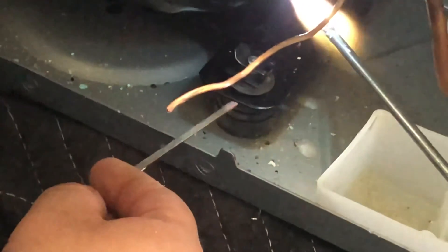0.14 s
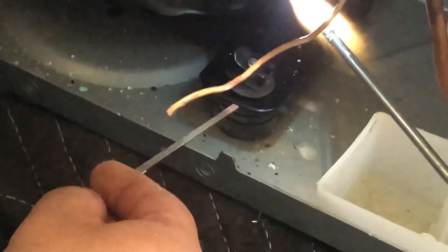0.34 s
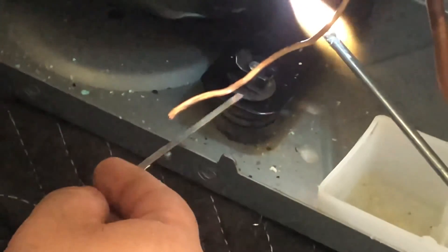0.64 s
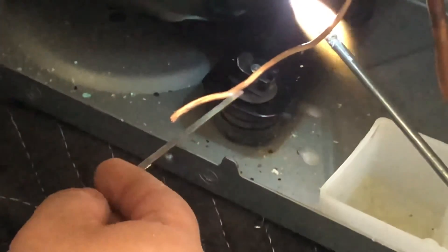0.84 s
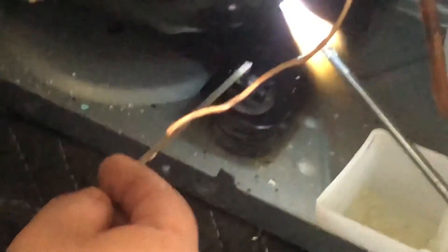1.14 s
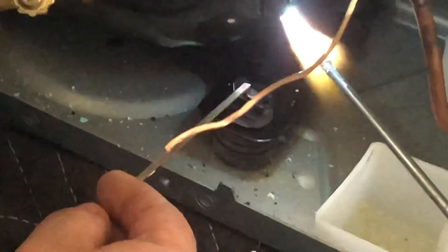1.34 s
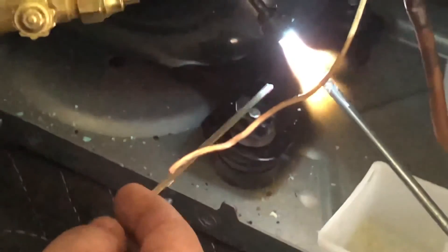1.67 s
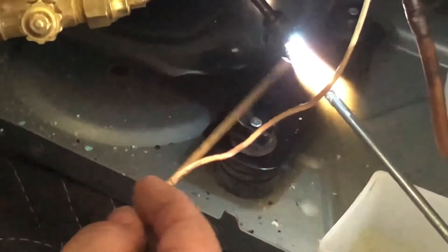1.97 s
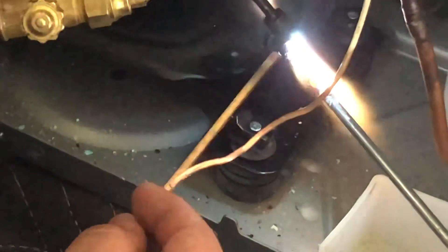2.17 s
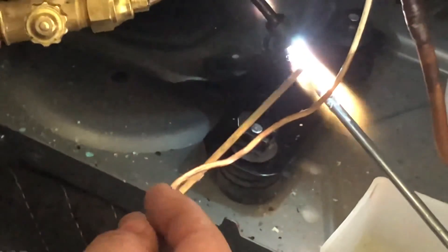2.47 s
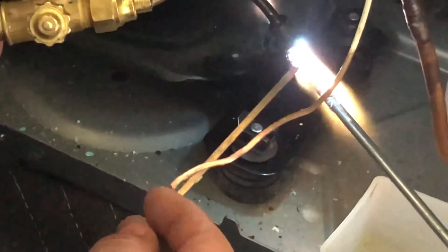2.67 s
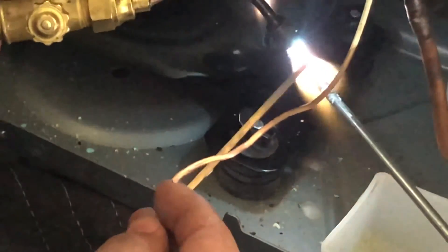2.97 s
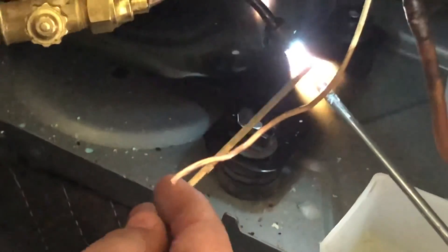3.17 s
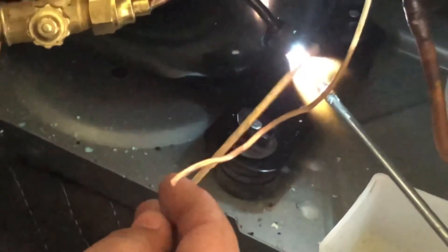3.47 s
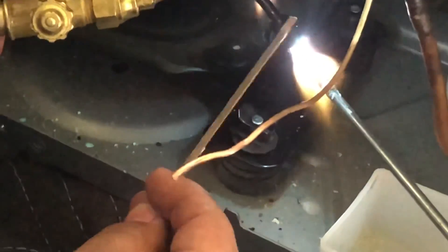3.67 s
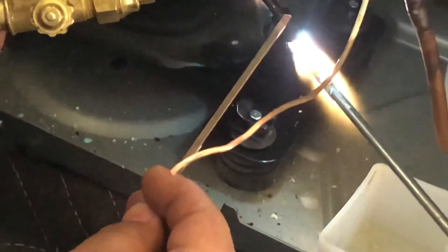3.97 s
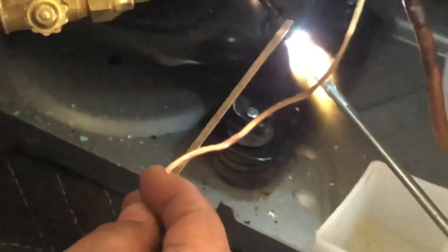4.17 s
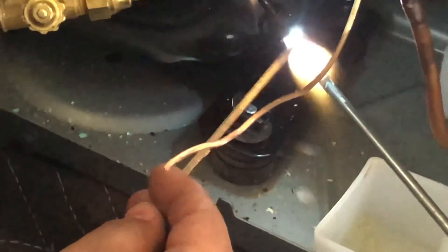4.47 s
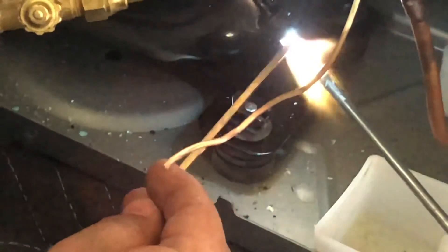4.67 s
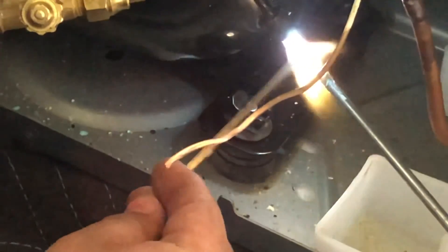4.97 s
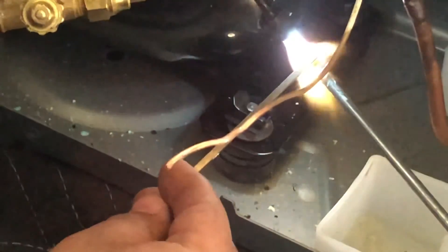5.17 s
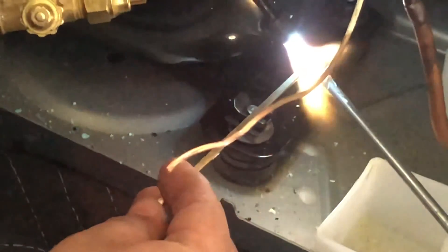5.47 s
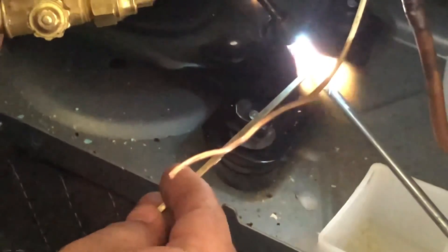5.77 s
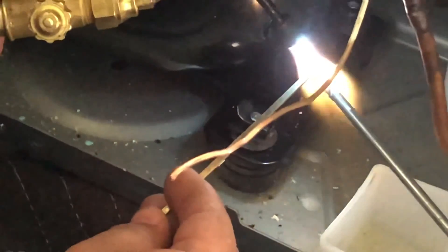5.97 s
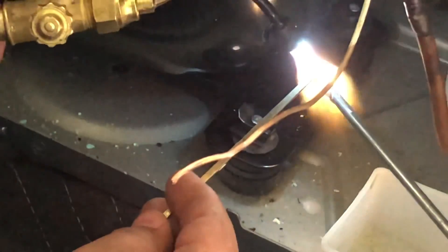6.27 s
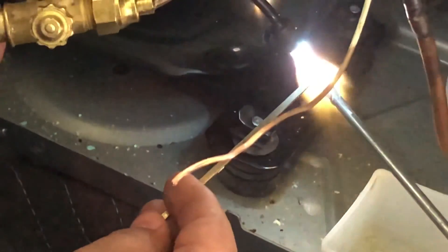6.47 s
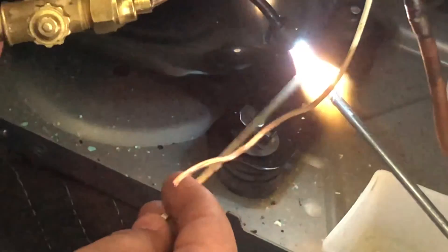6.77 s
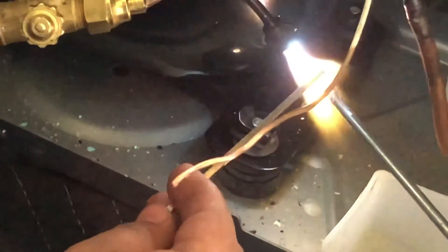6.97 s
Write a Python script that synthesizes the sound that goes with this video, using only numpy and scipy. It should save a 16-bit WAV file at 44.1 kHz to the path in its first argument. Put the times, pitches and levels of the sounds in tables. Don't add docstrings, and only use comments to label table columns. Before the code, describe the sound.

A gas torch is already burning close to the microphone and never stops. A strong, bright jet hiss dominates, over a thin roar with little deep bass that rings in an open metal cabinet. The hiss turns brighter near three seconds as the flame faces the work, with tiny flares, dips and constant fine flutter. The sound is essentially mono and ends still burning.

```python
import sys
import numpy as np
from scipy import signal
from scipy.fft import rfft, irfft
from scipy.io import wavfile
from scipy.ndimage import uniform_filter1d

SR = 44100
rng = np.random.default_rng(int(sys.argv[2]) if len(sys.argv) > 2 else 0)


def amplitude_ratio(level_db):
    exponent = np.asarray(level_db, float) / 20
    return 10 ** exponent


def generate_wav(sig):
    pcm = np.round(np.clip(np.atleast_2d(sig).T, -1, 1) * 32767).astype(np.int16)
    wavfile.write(sys.argv[1], SR, pcm)


N = 313551


def evened(x):
    return x / np.sqrt(np.mean(x ** 2) + 1e-20)


def resonances(table, hz):
    return sum(amplitude_ratio(db) ** 2 / (1 + (2 * (hz - f) / width) ** 2) ** 2 for f, width, db in table)


def above(hz, edge_hz, soft):
    return .5 + .5 * np.tanh(np.log((hz + 1) / edge_hz) / soft)


def thirds(hz, low_hz, high_hz, soft):
    above_low, above_high = above(hz, low_hz, soft), above(hz, high_hz, soft)
    return 1 - above_low, np.maximum(above_low - above_high, 0), above_high


def drift(shape, frames, bins):
    field = rng.standard_normal(shape)
    for size, axis in ((frames, 0), (bins, 1)):
        size = max(round(size), 1)
        field = uniform_filter1d(field, size, axis)
        field = uniform_filter1d(field, size, axis)
    return evened(field)


# time in seconds, lower edge in Hz, upper edge in Hz, level in dB.
SIDE_FLECKS = [(0.059, 4140, 6340, -33), (0.059, 11700, 13180, -38), (0.827, 8180, 10400, -34),
               (0.893, 12400, 13870, -31.6), (1.546, 5670, 6970, -38), (1.546, 7500, 9020, -35),
               (1.546, 12330, 14550, -30.8), (2.034, 6840, 9020, -36), (2.568, 13690, 15270, -35.0),
               (3.009, 11000, 12500, -37), (3.009, 13690, 15910, -32.6), (3.242, 8870, 10430, -33.4),
               (3.403, 5150, 6300, -35), (3.682, 12990, 14570, -27.8), (4.658, 14380, 15910, -31.7),
               (5.17, 10300, 11810, -33.6), (6.168, 8870, 10430, -33.6), (6.631, 8900, 10430, -33.5),
               (6.816, 4140, 5200, -37)]


def side_flecks():
    length, grid_start = 1024, 584
    out = np.zeros(N + 2 * length)
    n, line = np.arange(2 * length) + .5, np.arange(length) + .5
    line_hz = line * SR / (2 * length)
    fade = np.sin(np.pi / (2 * length) * n)
    waves = np.cos(np.pi / length * np.outer(n + length / 2, line)) * fade[:, None]
    for s, low_hz, high_hz, db in SIDE_FLECKS:
        at = grid_start + length * (round((s * SR - grid_start) / length) - 1)
        band = rng.standard_normal(length) * (line_hz > low_hz) * (line_hz < high_hz)
        out[at:at + 2 * length] += amplitude_ratio(db) * np.sqrt(2) * evened(waves @ band) / 2
    return out[:N]


def workshop(x, ripple_db=2.0):
    hz, _, z = signal.stft(x, SR, nperseg=4096)
    ripple = amplitude_ratio(ripple_db * drift(z.T.shape, 8, 3) * above(hz, 2660, 0.31))
    ripple /= np.sqrt(uniform_filter1d(ripple ** 2, size=60, axis=1))
    return signal.istft(z * ripple.T, SR, nperseg=4096)[1][:N]


# time in seconds, pose (0 raised, 1 aside, 2 facing, 3 on the rod, 4 on the joint).
TORCH_POSE = [(0, .01), (.6, 0.18), (1.0, 1.2), (1.3, 1.26), (2.98, 0.3), (3.05, 2), (3.2, 2.3), (3.3, 2),
              (4.5, 2), (4.8, 2.1), (5.15, 2.85), (5.8, 3.35), (6.1, 3.7), (7.11, 3.9)]


def torch_pose(t):
    return np.interp(t, *np.transpose(TORCH_POSE))


# burning, mixing zone, flame tip, jet, nozzle and lip fizz, all in dB.
POSE_DB = [
    (-32, -30.5, -27.5, -25, -27, -26),
    (-32, -30, -27.5, -25.5, -29, -24.5),
    (-33.5, -32, -26, -22.5, -25.5, -21),
    (-33.5, -32, -25.5, -24.5, -25.5, -23),
    (-33.5, -32, -27, -24, -26, -22.5),
]
# time in seconds, blast in dB.
BLAST = [(0, -.5), (.7, -0.2), (1.3, -0.9), (1.8, 0), (2.1, .5), (2.6, 0.1), (2.95, 0.9), (3.2, -1),
         (3.45, -0.5), (3.85, -0.4), (4.2, 1.4), (4.5, -0.1), (5.0, 0.2), (5.35, -0.4), (5.7, -0.8),
         (6.1, 0.1), (6.7, 0.3), (7.11, -0.9)]
# time in seconds, level in dB, length in seconds, brightness from -1 dull to 1 fizzy.
FLARES = [(.32, -0.5, 0.074, 0.18), (0.522, 1, .08, .2), (1.203, 2.5, .04, .2), (1.377, 1.8, .04, .2),
          (1.67, 2.5, .03, -.1), (1.71, -3, .04, -0.38), (1.85, -0.9, .14, -0.55), (1.962, 3.5, 0.066, -.2),
          (2.113, 2, .04, -.9), (2.2, -1.8, 0.22, 0.43), (2.77, 0.5, .05, .8), (3.01, 0, .04, .9),
          (3.136, -1.5, 0.09, -0.086), (3.267, 2, 0.026, -0.27), (3.358, 2, 0.083, 0.87),
          (3.57, 4, 0.074, 0.57), (3.72, 1.5, .06, .6), (4.04, 1, .08, 1), (4.216, 2.5, .05, 0.35),
          (4.302, 2.5, 0.043, .6), (4.73, 0.5, .04, -.2), (4.79, -3, .03, -0.37), (4.84, 0.8, .04, -.3),
          (5.3, -2, .1, 0.21), (6.0, 2, 0.046, 0.53), (6.718, -1.5, .03, -.2), (6.815, -2, .04, 0.69),
          (6.932, -2.5, 0.063, 0.48), (7.098, -3.5, 0.066, 0.0022)]
# dB moved per dB of blast (gain control ducks the burning),
BLAST_SHARE = (-0.027, -0.34, .6, 0.71, 0.91, 1.6)
FLARE_SHARE = (0.043, .15, 0.35, 0.58, 1.5, 0.63)
BRIGHT_SHARE = (-0.23, -.1, -0.41, -0.81, 0.4, 0.72)


def flame_layers_db(t):
    pose = torch_pose(t)
    pose_db = np.array([np.interp(pose, range(len(c)), c) for c in np.transpose(POSE_DB)])
    blast_db = np.interp(t, *np.transpose(BLAST))
    s, db, length, bright = np.transpose(FLARES)[:, :, None]
    bumps = db * np.exp(-(2 * (t - s) / length) ** 2 / 2)
    return (pose_db + np.outer(BLAST_SHARE, blast_db)
            + np.outer(FLARE_SHARE, bumps.sum(0))
            + np.outer(BRIGHT_SHARE, (bright * bumps).sum(0)))


# frequency in Hz, width in Hz, level in dB.
CABINET = [(76.6, 29, -18), (184.4, 74, -8.5), (242, 67, -9), (314, 53, -18), (354, 38, -19.9),
           (384, 26, -15), (450.7, 37, -6.5), (496, 31, -15.5), (531, 58, -9), (599, 25, -16),
           (635, 29, -13), (742, 127, -8.5), (790, 24, -13), (827, 43, -12.5), (880, 85, -7.5),
           (1017, 107, -6), (1154, 68, -19), (1254, 47, -9), (1307, 19, -13.5), (1370, 74, -22),
           (1432, 91, -12), (1482, 49, -12.5), (1520, 72, -13)]
# frequency in Hz, width in Hz, level in dB.
UPPER_CABINET = [(1648, 80, -11), (1695, 23, -10), (1705, 54, -5), (1768, 60, -2.5), (1820, 69, -8), (1930, 31, -13),
                 (1968, 86, -5), (2006, 38, -7.5), (2070, 190, -4), (2157, 63, -1), (2200, 20, -3.5),
                 (2260, 74, -5.5), (2320, 83, -11.5), (2493, 190, -1), (2580, 88, -3.5), (2645, 71, 0),
                 (2726, 62, -1.5), (2790, 62, -6), (2850, 54, -4.5), (2850, 44, -12), (3008, 170, 1),
                 (3059, 31, -17), (3070, 43, -3), (3190, 77, -8.5), (3248, 66, -4), (3350, 19, -12), (3420, 158, -8)]


def roar():
    hz, t = np.fft.rfftfreq(N, 1 / SR), np.arange(N) / SR
    flame_wind = resonances([(125, 40, -19.5)], hz)
    power = resonances(CABINET, hz) + resonances(UPPER_CABINET, hz) + flame_wind
    power *= above(hz, 41, .5) ** 2
    power *= 1 - above(hz, 3460, 0.018)
    noise = rfft(rng.standard_normal(N)) * np.sqrt(power)
    coarse_t = t[::256]
    out = np.zeros(N)
    for db, zone in zip(flame_layers_db(coarse_t)[:3], thirds(hz, 1556, 2335, 0.036)):
        layer = evened(irfft(noise * np.sqrt(zone), N))
        out += amplitude_ratio(np.interp(t, coarse_t, db)) * layer
    return out


def flapping(x, flap_db=0.45, from_hz=2200):
    hz, t, z = signal.stft(x, SR, nperseg=512)
    flap = flap_db * drift((len(t), 1), 4, 1).T
    z = z * amplitude_ratio(above(hz, from_hz, .2)[:, None] * flap)
    return signal.istft(z, SR, nperseg=512)[1][:N]


# frequency in Hz, width in Hz, level in dB. First the torch raised,
RAISED = [(3180, 250, 3), (3620, 410, -5.5), (4040, 170, -1), (4470, 400, -0.5), (4880, 130, -9),
          (5200, 390, -2.5), (5530, 160, -13), (5630, 240, -4), (5940, 220, -0.5), (6310, 180, -6),
          (7080, 620, -2), (7660, 340, -8), (7800, 150, -4), (8340, 530, -5), (8710, 160, -8),
          (8730, 760, -12), (9450, 750, -7), (9770, 140, -9.7), (10220, 480, -9), (10540, 440, -8),
          (11220, 760, -13), (11560, 350, -7), (11860, 240, -7.9), (12280, 430, -11.3), (12830, 970, -7.2),
          (13290, 110, -8.3), (13560, 960, -3.0), (14920, 1870, -8), (15260, 310, -10.8),
          (15650, 200, -4.1)]
ASIDE = [(3120, 100, 3), (3180, 270, 1), (3620, 370, -8), (3770, 170, -11), (4030, 200, -3.4),
         (4470, 380, -1.5), (4840, 100, -8), (5310, 680, -5.5), (5690, 190, -9), (6070, 400, -8.5),
         (6340, 170, -9), (7000, 740, -5.5), (7800, 220, -5), (7970, 150, -6), (8560, 680, -3.5),
         (9250, 130, -9.1), (9400, 950, -5), (10430, 970, -5.5), (11340, 480, -7), (11600, 370, -1.5),
         (11940, 170, -8.9), (12500, 1360, -8), (12500, 150, -5.5), (12960, 240, -9), (13400, 990, -2.5),
         (14230, 750, -7), (14670, 130, -11.1), (14960, 950, -10.8), (15310, 380, -7.5), (15800, 220, -1)]
FACING = [(3120, 70, -6.2), (3350, 600, -7.5), (3625, 210, -6), (4040, 370, -7.5), (4500, 410, -1.5),
          (5070, 420, -4.5), (5340, 240, -3.0), (5670, 210, -6), (6100, 390, -10.5), (6340, 114, 0.3),
          (6770, 610, -10), (7290, 260, -3.5), (7500, 750, -11), (8040, 170, -4), (8640, 640, -5),
          (9430, 270, -1), (9580, 550, -2), (10260, 590, -6.5), (10670, 260, -8), (11020, 170, -4),
          (11130, 310, -7.5), (11770, 320, -4), (12100, 470, -14), (12560, 610, -1.0), (13300, 800, -4),
          (14000, 650, -5), (14300, 330, -6), (14600, 600, -3.6), (15200, 480, -4), (15680, 110, -9)]
ON_ROD = [(3000, 760, -3), (3630, 320, -3), (4040, 280, -6), (4500, 410, 1.5), (4840, 140, -4),
          (5340, 250, -3.5), (5660, 330, -2), (5940, 250, -6), (6400, 570, -4), (7200, 620, -5),
          (7030, 140, -9), (7660, 230, -8.8), (7880, 220, -9.5), (8330, 470, -3.5), (8600, 480, -2),
          (8900, 160, -8.5), (9150, 150, -9.2), (9600, 460, -7.5), (10340, 770, -4.5), (11000, 180, -9),
          (11600, 1350, -4.5), (11960, 220, -12), (12200, 190, -6.9), (12430, 240, -8.5), (12860, 1090, -4),
          (13560, 590, -6), (14300, 920, -4), (14960, 540, -6.9), (15320, 260, -13), (15520, 590, -6.2)]
ON_JOINT = [(3040, 300, -7), (3420, 240, -4), (3600, 180, -7), (3990, 240, -3), (4460, 260, 2.5),
            (5120, 550, -7), (5250, 150, -3), (5450, 90, -11), (5650, 240, -5), (6030, 180, -7),
            (6260, 130, -8), (6540, 520, -7.5), (7270, 620, -4.5), (7820, 340, -11), (8330, 380, -7.5),
            (8530, 540, -6), (9430, 580, -2.5), (10350, 340, -9), (10340, 240, -5), (10810, 200, -8),
            (11220, 90, -6.1), (11600, 2000, -5.5), (12940, 580, -3.6), (13070, 150, -7.4),
            (13400, 420, -7), (13930, 720, -6), (14290, 110, -8.2), (14560, 820, -7), (15010, 300, -4),
            (15920, 1240, -8)]


def hiss(patchy_db=1.6, flicker_db=0.38, gust_db=0.33):
    size, hop = 1024, 256
    frames, hz = N // hop + 5, np.fft.rfftfreq(size, 1 / SR)
    t = np.arange(frames) * hop / SR
    pose = torch_pose(t)[:, None]
    colour_db = 0
    for k, echoes in enumerate((RAISED, ASIDE, FACING, ON_ROD, ON_JOINT)):
        nearness = np.clip(1 - abs(pose - k), 0, 1)
        colour_db = colour_db + nearness * 10 * np.log10(resonances(echoes, hz))
    colour_db += patchy_db * drift(colour_db.shape, 20.5, 8) * above(hz, 5500, 0.23)
    colour = amplitude_ratio(colour_db) ** 2 * above(hz, 3350, 0.047) * (hz < 15970)
    power = np.zeros(colour.shape)
    for db, zone in zip(flame_layers_db(t)[3:], thirds(hz, 7540, 10720, 0.048)):
        layer = colour * zone
        power += amplitude_ratio(db)[:, None] ** 2 * layer / layer.sum(1)[:, None]
    flutter_db = flicker_db * drift((frames, 1), 2, 1) + gust_db * drift(power.shape, 5, 47)
    z = rng.standard_normal((frames, len(hz), 2)) @ [1, 1j]
    z *= np.sqrt(power) * amplitude_ratio(flutter_db)
    out = signal.istft(z.T, nperseg=size, noverlap=size - hop)[1][:N]
    return evened(out) * np.sqrt(np.mean(power.sum(1)))


def scene():
    torch = flapping(workshop(roar() + hiss()))
    return np.tile(torch, (2, 1))


def low_pass(x):
    return signal.sosfilt(signal.butter(12, 15770, fs=SR, output="sos"), x)


def record(dry):
    mix = dry + side_flecks() * [[1], [-1]]
    return low_pass(mix)


dry = scene()
out = record(dry)
generate_wav(out)
```